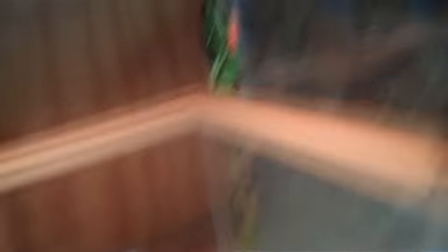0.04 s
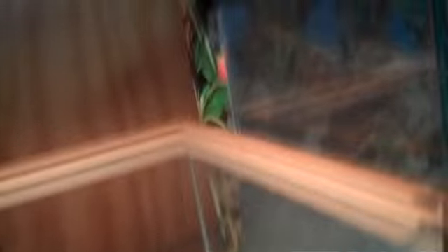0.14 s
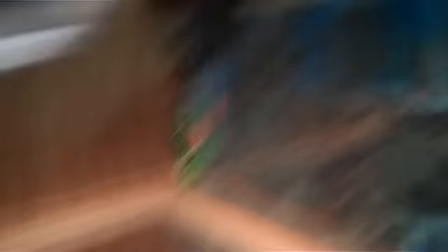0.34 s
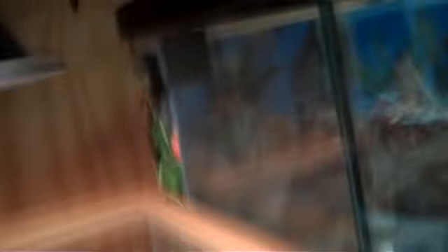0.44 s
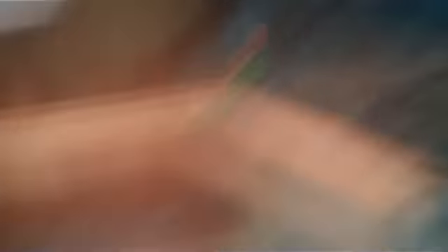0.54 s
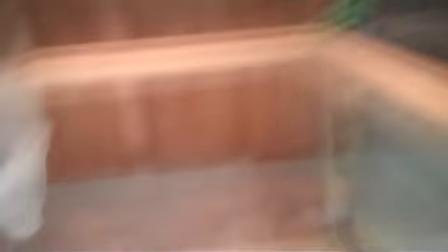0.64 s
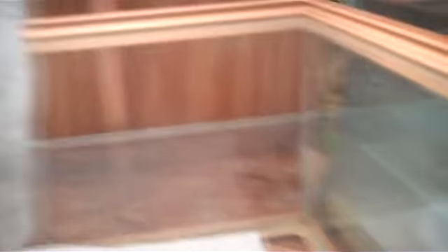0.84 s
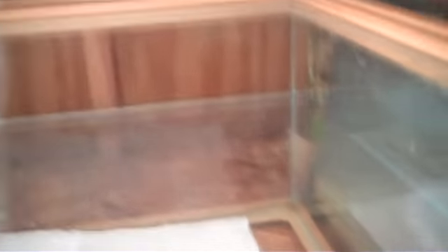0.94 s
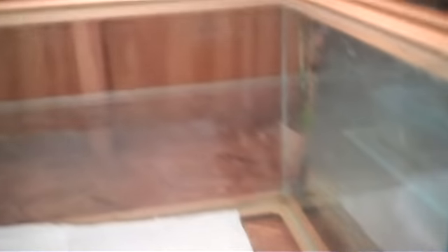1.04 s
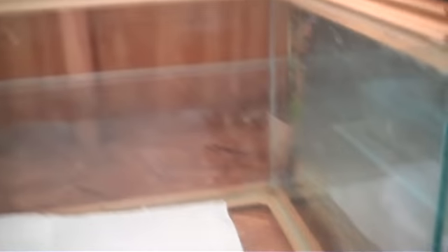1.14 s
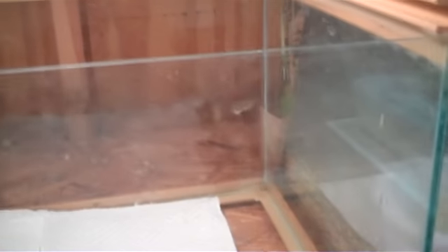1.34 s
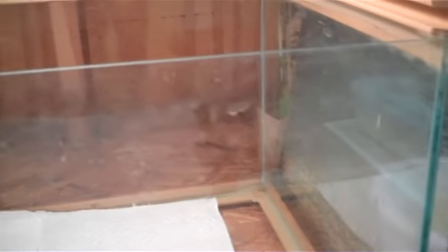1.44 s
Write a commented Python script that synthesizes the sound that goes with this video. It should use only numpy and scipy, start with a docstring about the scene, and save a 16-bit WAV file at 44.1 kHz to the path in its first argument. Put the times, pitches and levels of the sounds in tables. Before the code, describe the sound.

Thin plastic crackles close up in a small room. Light pops from 0.03 s build to the sharpest, loudest cracks around 0.17-0.21 s, with another crisp cluster near 0.31 s, amid dry rustle and low handling rumble. After 0.4 s it drops to faint rustling and isolated ticks near 0.54, 0.64, 0.71, 0.94, 0.99, 1.11 and 1.17 s, over quiet room noise and barely audible hum.

```python
"""Small room, close range: a thin plastic container is gripped and tilted, its walls pop and crack.
Pops are damped wall modes; cracks are short rings with a sharp edge, each with a rattle of noise.
Dry bedding rustles and the hand on the camera rumbles, most at first: clumped random clicks, band-filtered.
Single-pitch swings knock and tick; steady noise and a narrow hum lie beneath.
Each microphone port has its own treble resonance."""
import sys
import numpy as np
from scipy import signal
from scipy.io import wavfile
from scipy.ndimage import uniform_filter1d

SR = 44100
rng = np.random.default_rng(int(sys.argv[2]) if len(sys.argv) > 2 else 0)


def log_audio(samples):
    """Write samples as a 16-bit WAV file to the path given in sys.argv[1]."""
    # one column per channel
    frames = np.atleast_2d(samples).T
    # limit to full scale, then quantise
    limited = np.clip(frames, -1, 1)
    pcm = np.round(limited * 32767).astype(np.int16)
    wavfile.write(sys.argv[1], SR, pcm)


def field_ratio(decibels):
    """Amplitude ratio for a level in dB (20 dB per decade); scalars and array-likes work."""
    return 10 ** (np.asarray(decibels, dtype=float) / 20)


N = 63945

# indoor noise spectrum: f/Hz, relative level/dB
ROOM_SPECTRUM = [(20, -27), (60, 3.5), (150, -3.5), (330, -8), (620, -7), (1500, -18), (4000, -17.5),
                 (9000, -23.5), (15000, -50)]
# handling rumble, coarse and fine rustle spectra: f/Hz, relative density/dB
RUMBLE_SPECTRUM = [(15, -16), (40, -2), (90, -4.5), (200, 1), (350, -3.5), (700, -10), (1500, -43)]
COARSE_SPECTRUM = [(150, -17), (400, -2), (900, 0), (2000, 0.5), (4000, -4), (7000, -13.5), (12000, -32)]
FINE_SPECTRUM = [(1500, -34.5), (3000, 0), (5000, -1), (8000, -1.5), (10500, 3), (13000, -4), (16000, -64)]
# friction levels over time: t/s, fine rustle level/dB, coarse rustle level/dB, rumble level/dB
FRICTION_LEVELS = [(0, -85, -51.5, -69), (0.034, -61, -111, -48), (0.06, -72, -43, -66),
                   (.098, -59, -47, -49), (0.105, -50, -41, -44.5), (0.12, -50, -55, -43),
                   (0.133, -48, -42, -39), (0.143, -60, -47, -50), (.152, -63, -59, -38),
                   (0.179, -59, -38.5, -38.5), (0.186, -69, -34, -36), (0.209, -43, -60, -42),
                   (0.234, -52, -49.5, -39), (.262, -47.5, -41, -45.5), (0.283, -50.5, -54, -42),
                   (0.306, -39, -45.5, -48.5), (0.324, -37.5, -44, -30), (0.334, -61, -54, -64),
                   (.36, -57, -55.5, -58), (.385, -54.5, -55.5, -57), (.42, -57, -61, -50),
                   (.43, -63, -60, -71), (.47, -59, -54.5, -59), (.56, -62.5, -66.5, -64.5),
                   (.62, -56, -54, -56.5), (.7, -56.5, -59.5, -57.5), (.79, -55, -53.5, -54.5),
                   (.86, -59.5, -64, -58.5), (.93, -55, -53, -56.5), (1.03, -50, -51, -55.5),
                   (1.09, -53.5, -52, -62.5), (1.155, -57, -59, -60), (1.2, -56.5, -57, -55),
                   (1.27, -56.5, -57, -58), (1.31, -55.5, -53, -60), (1.45, -55, -59.5, -63)]
# knocks and ticks, from the hand on the camera (low) and small items in the container:
# t/s, level/dB, f/Hz, envelope scale/cycles, left-right/dB
KNOCKS = [(0.029, -43.5, 228, 3.5, 5), (0.0269, -32.5, 560, 1.95, 12.5), (0.0278, -21.5, 1750, 2, 2),
          (0.0554, -24.5, 2200, 2.8, -14.5), (.0835, -28, 720, 3.7, 8.5), (.115, -42, 290, 2.5, 13),
          (.17, -36, 180, 1, 6), (0.182, -31.5, 81, 1.34, 16), (.2145, -27.5, 850, 4, 6),
          (.248, -35.5, 277, 1.1, 28), (.257, -30, 237, 2.66, 8), (0.291, -44, 45, 0.51, 5),
          (0.312, -33, 128, 0.89, 3), (0.406, -42.5, 114, 1.3, 0), (.5365, -39.5, 597, 4.7, -4),
          (.554, -52, 3790, 15, -8), (0.7126, -25, 2270, 1, 1.5), (0.808, -49, 76, 6, -4),
          (.9388, -36.5, 710, 2.7, 2), (.9866, -24, 2300, 0.81, 1), (1.08, -44.5, 930, 4.2, 6),
          (1.1097, -26, 3270, 2.15, 1.5), (1.175, -37.5, 674, 6.3, 3), (1.293, -43.5, 1220, 12, 1),
          (1.297, -47.5, 714, 2.5, 4)]
# bright ticks on the sharpest cracks: t/s, level/dB, left-right/dB
BRIGHT_TICKS = [(.1702, -15, 3), (.1828, -3, 3), (.2144, -13, 3), (.6408, -26, 3)]
# wall modes: f/pop pitch, level/dB, decay to 1/e/cycles
WALL_MODES = [(.45, -9, .9), (.68, -6, 1.1), (1.0, 0, 1.3), (1.35, -4, 1.4), (1.8, -6, 1.5),
              (2.4, -11, 1.5)]
# wall buckling: t/s, pop level/dB, pop f/Hz, crack level/dB, rattle level re both/dB, left-right/dB
BUCKLES = [(0.0271, -23, 1430, -40, -18, -4), (0.0528, -37, 3780, -41, -21, -18),
           (0.054, -37, 2240, -51, -9, -12), (0.0572, -30.5, 2250, -52, -1, -4),
           (0.0828, -27, 752, -28, -10.5, -8.5), (0.1158, -34, 800, -56, -1, -7),
           (0.139, -28.5, 1500, -28.5, -8, -4), (0.1684, -27, 1530, -24, -20, 0),
           (0.1695, -15, 1490, -4.5, -24, -3), (0.1772, -22, 2980, -41, -11, -12.5),
           (0.1811, -24.5, 3200, -37, -12.5, 3), (0.1825, -16.5, 1230, -7.5, -18.5, -2),
           (0.1909, -24, 1090, -40, -32, 9), (0.2002, -31.5, 1236, -37, -1, -13),
           (0.214, -19.5, 3590, -17, -24.5, -2.5), (0.214, -24.5, 2610, -22, -15, -5),
           (0.2158, -28, 1080, -44, -10, -5), (0.2195, -46, 2500, -23.5, -12, -3),
           (0.2474, -28.5, 970, -43, -17, -4), (0.252, -60, 2620, -33, -8, -17.5),
           (0.2612, -30, 1720, -34, -19, -7), (0.271, -44, 1740, -33, -2.5, -1),
           (0.2903, -34.5, 1530, -33, -9.5, -5), (0.2978, -46, 1410, -29, -31, -10),
           (0.3062, -36, 3300, -34, -26, -9), (0.3069, -55, 3360, -25, -18, -10),
           (0.31, -34, 3350, -22, -16, -1), (0.312, -21, 3420, -10.5, -13, 3.5),
           (0.3128, -22, 1715, -11.5, -19, 0), (0.3129, -29.5, 3020, -25.5, -18, -3),
           (0.319, -48, 2980, -27, -10, -6), (0.3196, -30, 4570, -31, -9.5, -6.5),
           (0.3203, -35.5, 5030, -34, -5.5, -7), (0.3233, -34, 4750, -33, -22, -1),
           (0.3262, -42, 3900, -34, -33, 0), (0.361, -38, 2230, -42, -31, 7),
           (0.377, -55, 2500, -31.5, -10, -3), (0.404, -40.5, 1270, -34, -11, -0.5),
           (0.5377, -38.5, 900, -40, -7.5, -3.5), (0.6403, -38.5, 3700, -21, -9, 5),
           (0.6439, -39, 4360, -29, -5, 1.5), (0.658, -47, 2980, -39, -5, 0),
           (0.7128, -38.5, 1630, -47, -2.5, 1), (0.812, -44, 840, -55, -8, 2),
           (0.8786, -40, 2700, -45, -15, 4), (0.9123, -43, 1320, -49, -3, 5),
           (0.939, -36, 1950, -35, -9, 2.5), (0.9877, -30, 2300, -50, -10.5, 2),
           (1.052, -39, 2640, -41, -7, 2), (1.0822, -52, 1970, -38, -8, 2),
           (1.1097, -44, 4500, -30, -12, 3), (1.1741, -26.5, 4220, -22.5, -10.5, 5),
           (1.1751, -26.5, 2020, -27, -11, 3), (1.223, -62, 1460, -44, -25, 4),
           (1.2577, -45, 2640, -62, -31, 2), (1.2926, -33.5, 4270, -48, -6, 2.5),
           (1.3799, -47, 2480, -37, -2.5, -0.5)]
# port responses: f/Hz, level/dB
LEFT_PORT = [(30, -10.5), (2000, -3), (4000, -0.5), (5600, 3.5), (6500, 7), (7250, 17), (7900, 13.5),
             (8800, 5), (10500, -3.5), (13000, -3), (16300, -16.5), (17000, -50)]
RIGHT_PORT = [(30, -13.5), (2000, -0.5), (4000, 5), (5200, 8), (5900, 12), (6500, 10), (7400, 3),
              (9000, 0.5), (11000, -19.5), (13000, -32), (16300, -31), (17000, -56.5)]

ROOM_TONE_DB = -57.5
HUM_HZ, HUM_PASS_WIDTH_HZ, HUM_DB = 335.1, 8.9, -64.5
ROOM_T60_S, WET_DB, ROOM_TOP_HZ = 0.33, -17.5, 6400
FINE_PER_S, COARSE_PER_S, RUMBLE_PER_S = 2000, 1600, 200  # clicks per band and channel
GRIP_END_S, GRIP_LEFT_DB = 0.29, 9  # while the hand shifts, pops reach the left port more strongly
FINE_EARLY_PAN_DB, FINE_LATE_PAN_DB = -6, 0  # right-weighted until GRIP_END_S, then even
TICK_LOW_HZ = 9400
POP_RISE_CYCLES = 0.45
CRACK_LOW_HZ, CRACK_HZ, CRACK_SPREAD, CRACK_RING_S = 3430, 5990, 0.025, 0.00028
EDGE_S, EDGE_DB = 0.000373, -2  # edge inside the crack's ring
LAG_S, LAG_SPREAD_S = 0.00004, 0.00002  # the right port hears a crack later
RATTLE_T60_S, RATTLE_RISE_S = 0.048, 0.00048
HISS_TOP_HZ, HISS_DB = 10100, -5


def evened(x):
    """Scales to rms 1."""
    return x / np.sqrt(np.mean(x ** 2) + 1e-20)


def colour(points, size=4096):
    """Minimum-phase filter taps for a spectrum given as (f/Hz, level/dB)."""
    f, db = np.transpose(points)
    hz = np.fft.rfftfreq(size, 1 / SR)
    log_gain = np.interp(np.log(hz + 1), np.log(f + 1), db) * np.log(10) / 20
    full = np.concatenate([log_gain, log_gain[-2:0:-1]])
    response = np.exp(np.conj(signal.hilbert(full)))
    return np.fft.ifft(response).real[:size // 2]


def add(mix, s, sound):
    """Mixes a two-channel sound in at time s."""
    part = mix[:, round(s * SR):][:, :sound.shape[1]]
    part += sound[:, :part.shape[1]]


def pair(x, other, same, pan_db):
    """Left is x; right shares the fraction same of it; pan_db is left over right."""
    same, half = np.clip(same, 0, 1), np.reshape(pan_db, -1) / 2
    right = same * x + np.sqrt(1 - same ** 2) * other
    return field_ratio(np.array([half, -half])) * np.array([x, right])


def room_tone():
    """Quiet steady indoor noise: filtered white noise, partly shared by the channels."""
    settle = 2048
    white = rng.standard_normal((2, N + settle))
    a, b = signal.oaconvolve(white, colour(ROOM_SPECTRUM)[None], axes=1)[:, settle:N + settle]
    return field_ratio(ROOM_TONE_DB) * evened(pair(a, b, 0.68, 0))


def hum():
    """Faint wavering appliance hum: noise passed twice through one narrow resonance."""
    band = signal.iirpeak(HUM_HZ, HUM_HZ / HUM_PASS_WIDTH_HZ, fs=SR)
    once = signal.lfilter(*band, rng.standard_normal(N + SR))
    twice = signal.lfilter(*band, once)
    return field_ratio(HUM_DB) * evened(twice[SR:])


def room(x):
    """Short diffuse tail of a small room: sparse decaying random taps, unlike in each channel."""
    t = np.arange(SR // 4) / SR
    sparse = rng.standard_normal((2, len(t))) * (rng.random((2, len(t))) < 0.05)
    taps = sparse * (t > 0.003) * field_ratio(-60 * t / ROOM_T60_S)
    taps = taps / np.linalg.norm(taps, axis=1, keepdims=True)
    dull = signal.lfilter(*signal.butter(2, ROOM_TOP_HZ, fs=SR), x)
    return field_ratio(WET_DB) * signal.oaconvolve(dull, taps, axes=1)[:, :N]


def grains(per_s, spread_db, spectrum, column, same, pan_db, clump_db, count=5):
    """Friction: clumped random clicks ring in each band, then take the spectrum and level curve."""
    edges, out = np.geomspace(spectrum[0][0], spectrum[-1][0], count + 1), np.zeros((2, N))
    for band in zip(edges, edges[1:]):
        size_db = spread_db * np.minimum(rng.exponential(1, (2, N)), 4)
        size = field_ratio(size_db) * rng.standard_normal((2, N))
        drift = uniform_filter1d(rng.standard_normal(N), size=250)
        clump = field_ratio(clump_db * evened(uniform_filter1d(drift, size=250)))
        clicks = size * clump * (rng.random((2, N)) < per_s / SR)
        out += signal.sosfilt(signal.butter(2, band, "band", fs=SR, output="sos"), clicks)
    a, b = signal.oaconvolve(out, colour(spectrum)[None], axes=1)[:, :N]
    rows = np.array(FRICTION_LEVELS)
    level_db = np.interp(np.arange(N) / SR, rows[:, 0], rows[:, column])
    return field_ratio(level_db) * evened(pair(a, b, same, pan_db))


def handling_rumble():
    """The hand on the camera: sparse low-frequency clicks."""
    return grains(RUMBLE_PER_S, 2.75, RUMBLE_SPECTRUM, column=3, same=0.74, pan_db=3.0, clump_db=4.0)


def coarse_rustle():
    """Lower part of the sliding bedding, largely shared by both channels and stronger on the left."""
    return grains(COARSE_PER_S, 2.35, COARSE_SPECTRUM, column=2, same=0.9, pan_db=4.0,
                  clump_db=2.5, count=8)


def fine_rustle():
    """Treble part of the sliding bedding: dense clicks, right-weighted at first, then even."""
    early = np.arange(N) < GRIP_END_S * SR
    pan_db = np.where(early, FINE_EARLY_PAN_DB, FINE_LATE_PAN_DB)
    return grains(FINE_PER_S, 0.65, FINE_SPECTRUM, column=1, same=0.23, pan_db=pan_db,
                  clump_db=1.5, count=8)


def knocks():
    """Soft single-pitch swings: a sine under a rise-and-decay envelope."""
    mix = np.zeros((2, N))
    for s, db, hz, cycles, pan_db in KNOCKS:
        u = np.arange(0, 2 * cycles / hz, 1 / SR) * hz / cycles
        envelope = np.e * 4 * u * np.exp(-4 * u)  # peaks at 1
        swing = field_ratio(db) * envelope * np.sin(2 * np.pi * cycles * u)
        # both sides carry the same swing, weighted by left-right level
        add(mix, s, pair(swing, swing, 0, pan_db))
    return mix


def bright_ticks():
    """Sharp edges: high-passed single-sample impulses."""
    mix = np.zeros((2, N))
    edge = signal.lfilter(*signal.butter(2, TICK_LOW_HZ, "high", fs=SR), signal.unit_impulse(64))
    for s, db, pan_db in BRIGHT_TICKS:
        add(mix, s, field_ratio(db) * pair(edge, edge, 0, pan_db))
    return mix


def pop_modes(t, hz):
    """A buckling wall rings in damped modes after a soft onset."""
    modes = np.zeros(len(t))
    for ratio, db, cycles in WALL_MODES:
        f = hz * ratio
        modes += field_ratio(db) * np.exp(-f * t / cycles) * np.sin(2 * np.pi * f * t)
    return modes * (1 - np.exp(-(hz * t / POP_RISE_CYCLES) ** 2))


def crack(t):
    """A short treble ring plus one sharp edge, later in the right channel."""
    pitch_draw, lag_draw = rng.standard_normal(2)
    lag_s = abs(LAG_S + LAG_SPREAD_S * lag_draw) * np.array([[0], [1]])
    late = np.maximum(t - lag_s, 0)
    hz = CRACK_HZ * (1 + CRACK_SPREAD * pitch_draw)
    burst = late * np.exp(-late / CRACK_RING_S) * np.sin(2 * np.pi * hz * late)
    edge = field_ratio(EDGE_DB) * np.sinc((late - EDGE_S) * SR) * (late > 0)
    high = signal.butter(2, CRACK_LOW_HZ, "high", fs=SR)
    return signal.lfilter(*high, burst / np.linalg.norm(burst[0]) + edge)


def snap(s, pop_db, hz, crack_db, rattle_db, pan_db):
    """A wall buckles: pop and crack, each with a fading noise rattle of like colour."""
    t = np.arange(4000) / SR
    modes = pop_modes(t, hz)
    sharp = crack(t)
    ring_noise, hiss_noise = rng.standard_normal((2, 2, len(t)))
    fade = (1 - np.exp(-t / RATTLE_RISE_S)) * field_ratio(rattle_db - 60 * t / RATTLE_T60_S)
    mode_taps = modes[None] / np.linalg.norm(modes)
    ring = fade * signal.oaconvolve(ring_noise, mode_taps, axes=1)[:, :len(t)]
    band = signal.butter(2, [CRACK_LOW_HZ, HISS_TOP_HZ], "band", fs=SR)
    hiss = fade * field_ratio(HISS_DB) * signal.lfilter(*band, hiss_noise)
    pop_pan_db = pan_db + GRIP_LEFT_DB * (s < GRIP_END_S)
    low = pair(modes / abs(modes).max() + ring[0], ring[1], 0.87, pop_pan_db)
    high = pair(sharp[0], sharp[1], 0, pan_db) + pair(hiss[0], hiss[1], 0.7, pan_db)
    return field_ratio(pop_db) * low + field_ratio(crack_db) * high


def snaps():
    """All pops and cracks of the container."""
    mix = np.zeros((2, N))
    for row in BUCKLES:
        add(mix, row[0], snap(*row))
    return mix


def scene():
    """Container and bedding excite the room; rumble, room tone and hum are added dry."""
    near = fine_rustle() + coarse_rustle() + knocks() + bright_ticks() + snaps()
    return room_tone() + hum() + room(near) + handling_rumble() + near


def low_pass(x):
    """Removes everything above the highest recorded frequency."""
    return signal.sosfilt(signal.butter(12, 16650, fs=SR, output="sos"), x)


def record(dry):
    """Each port colours the sound by its own resonance, the right one a sample later."""
    taps = np.array([colour(LEFT_PORT), np.roll(colour(RIGHT_PORT), 1)])
    mix = signal.oaconvolve(dry, taps, axes=1)[:, :N]
    return low_pass(mix)


dry = scene()
out = record(dry)
log_audio(out)
```